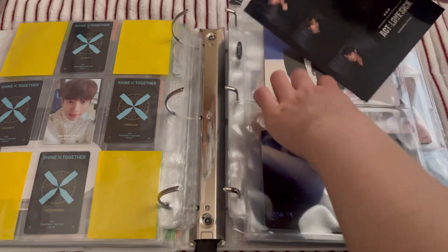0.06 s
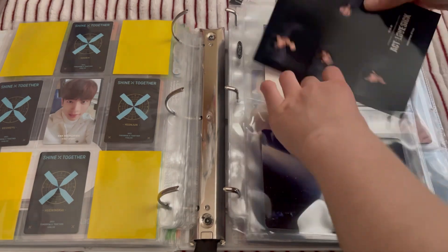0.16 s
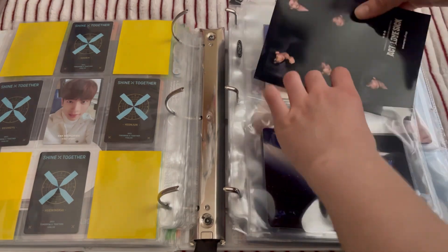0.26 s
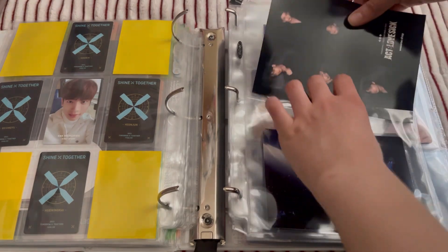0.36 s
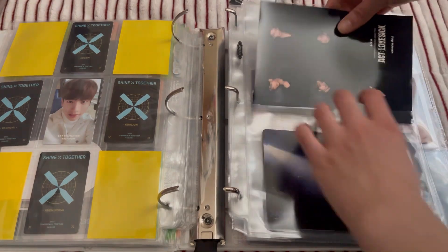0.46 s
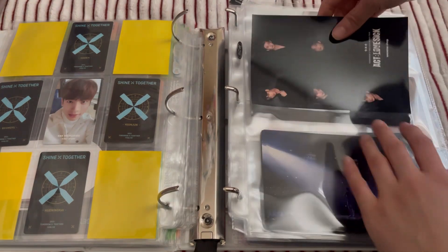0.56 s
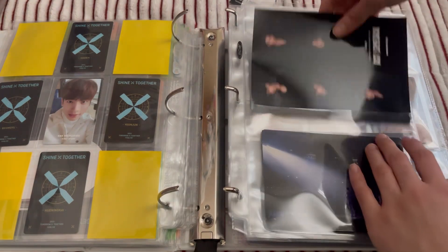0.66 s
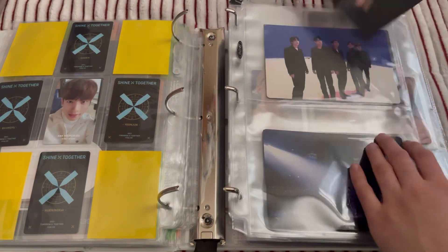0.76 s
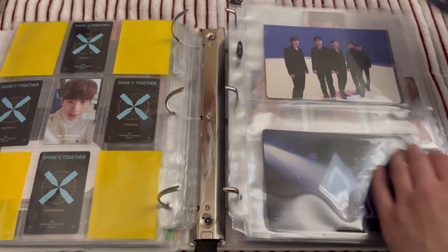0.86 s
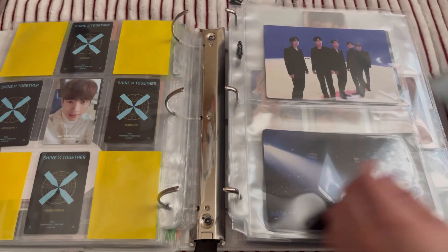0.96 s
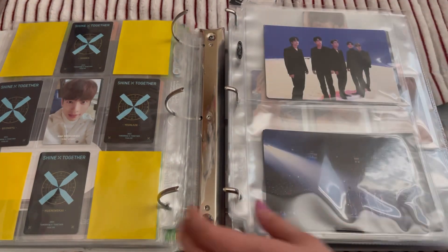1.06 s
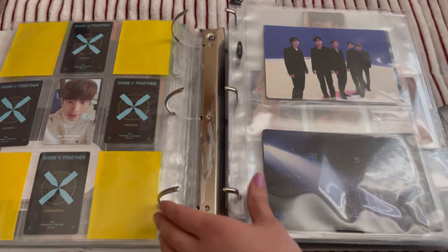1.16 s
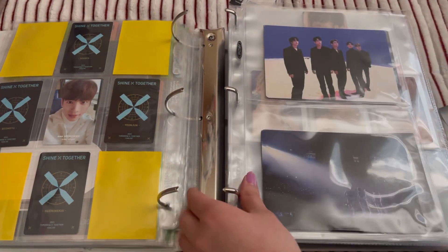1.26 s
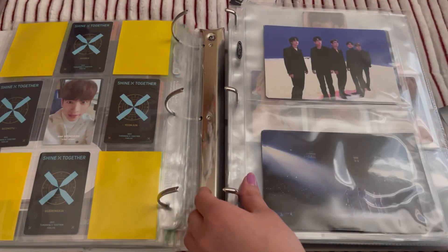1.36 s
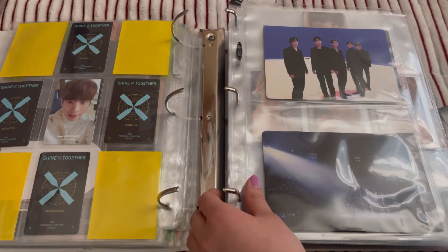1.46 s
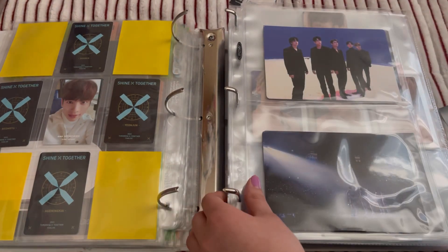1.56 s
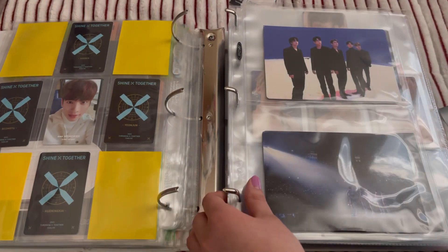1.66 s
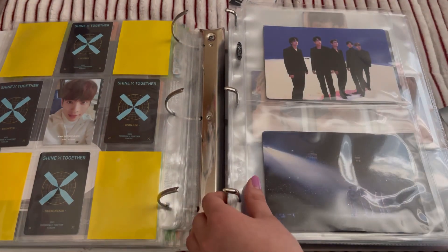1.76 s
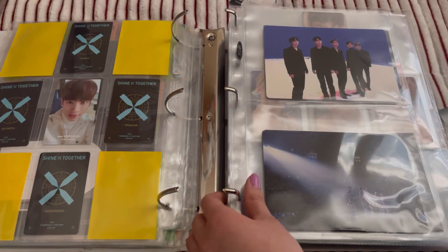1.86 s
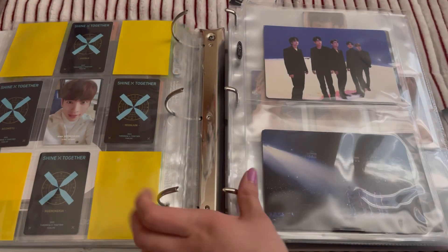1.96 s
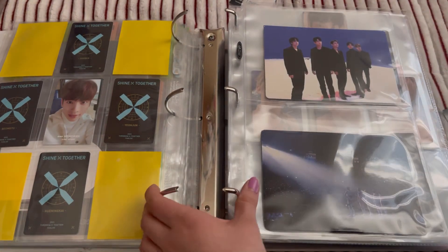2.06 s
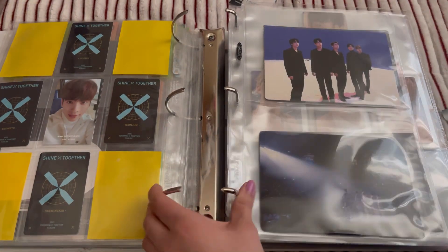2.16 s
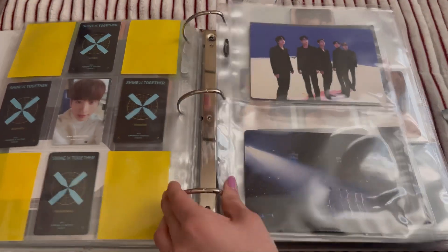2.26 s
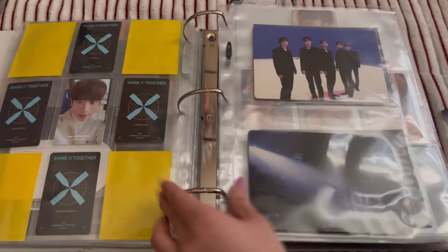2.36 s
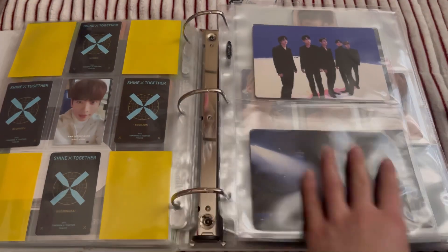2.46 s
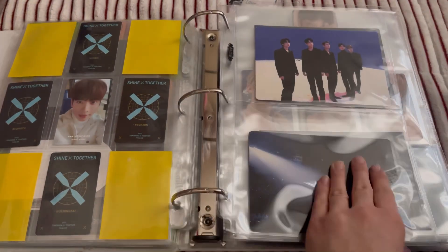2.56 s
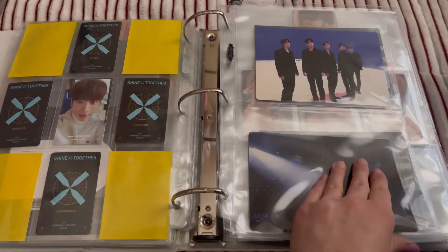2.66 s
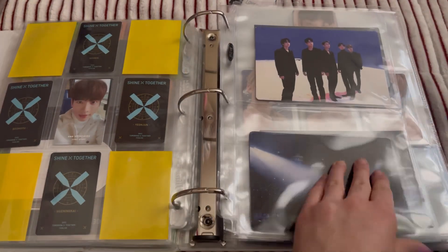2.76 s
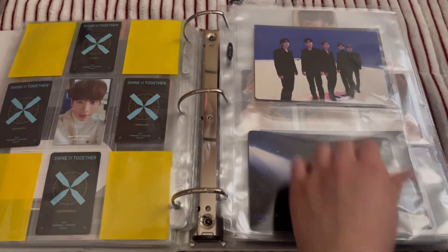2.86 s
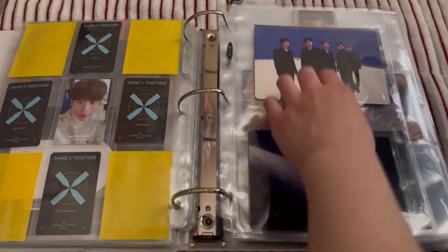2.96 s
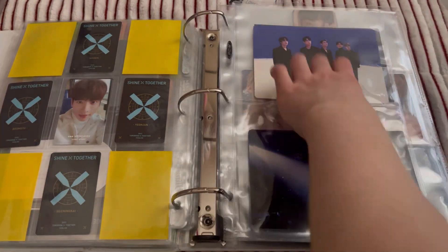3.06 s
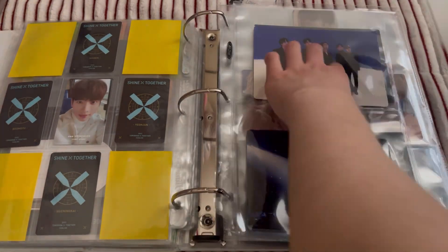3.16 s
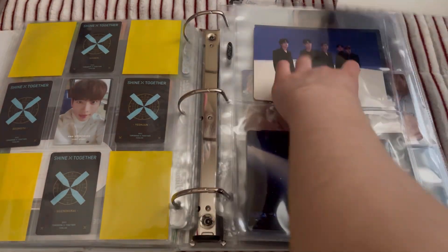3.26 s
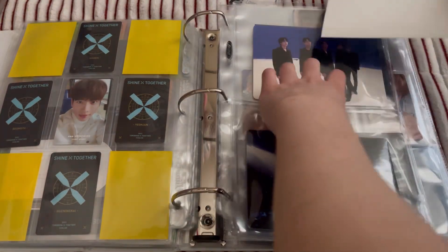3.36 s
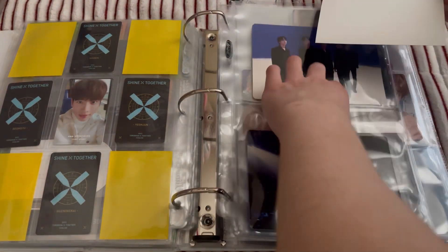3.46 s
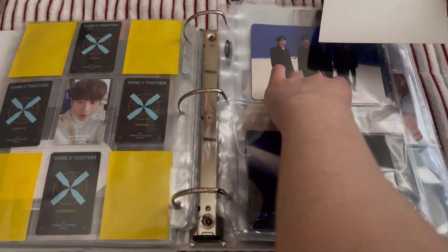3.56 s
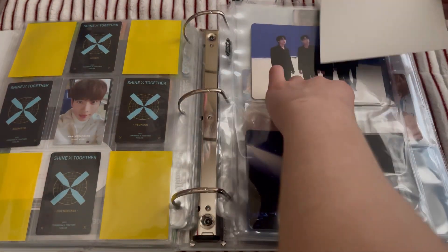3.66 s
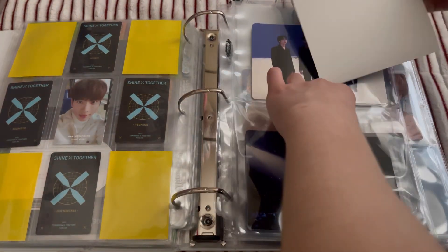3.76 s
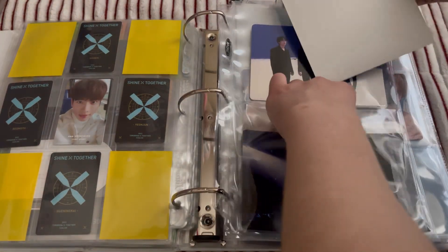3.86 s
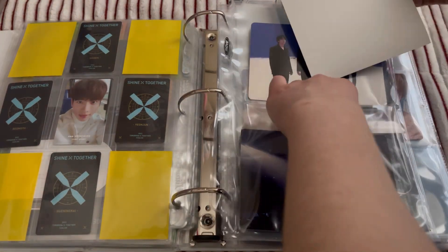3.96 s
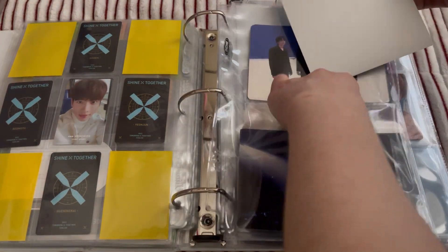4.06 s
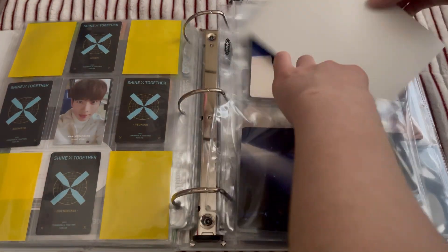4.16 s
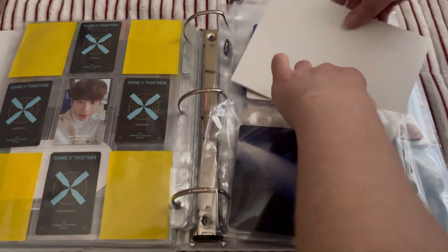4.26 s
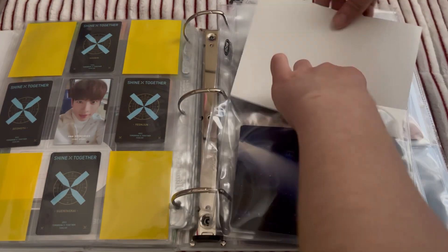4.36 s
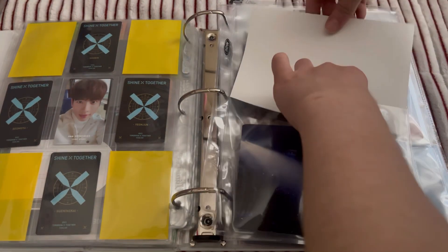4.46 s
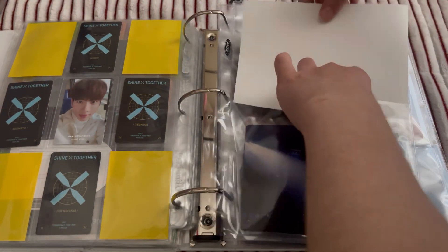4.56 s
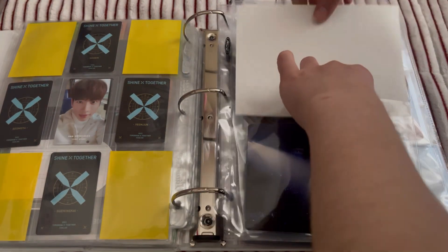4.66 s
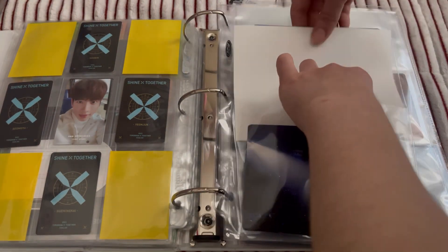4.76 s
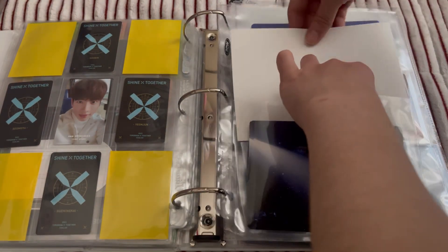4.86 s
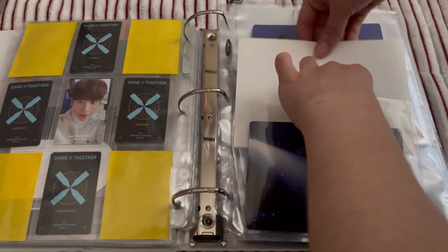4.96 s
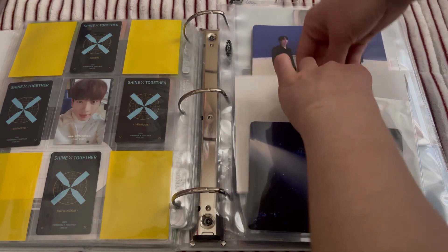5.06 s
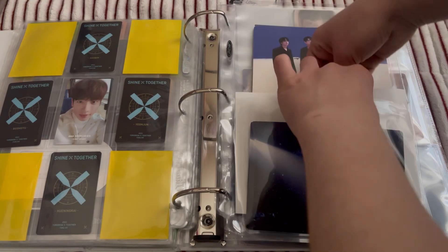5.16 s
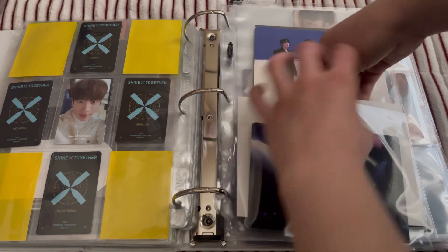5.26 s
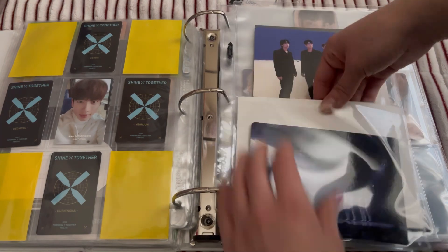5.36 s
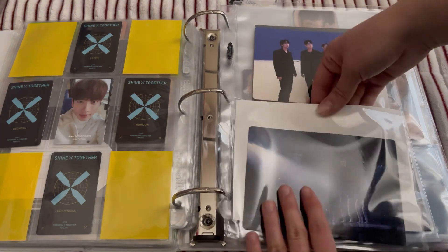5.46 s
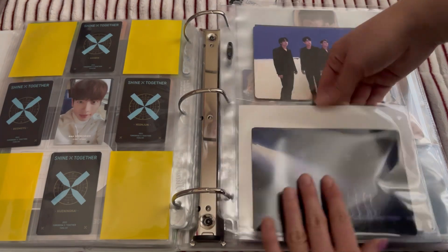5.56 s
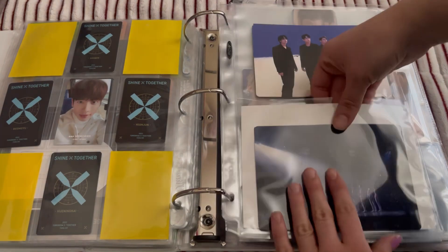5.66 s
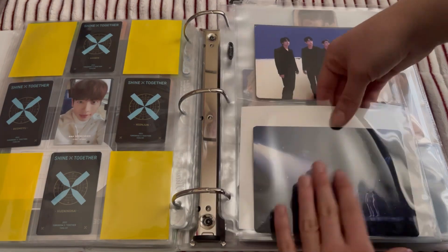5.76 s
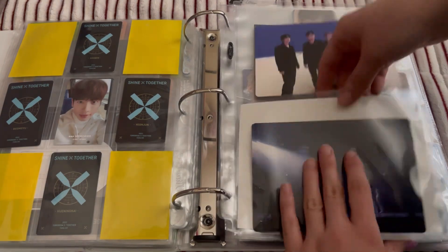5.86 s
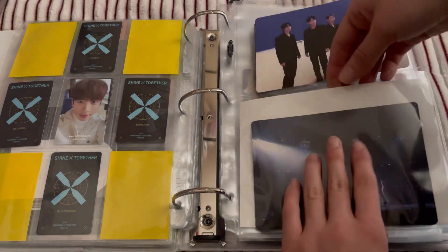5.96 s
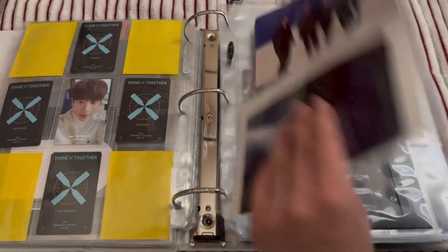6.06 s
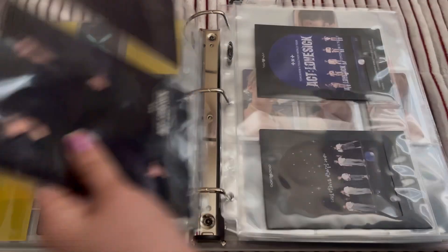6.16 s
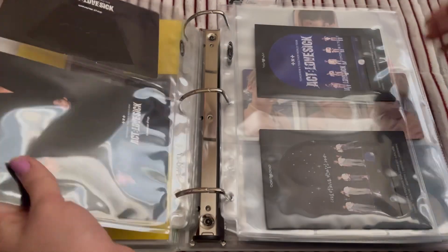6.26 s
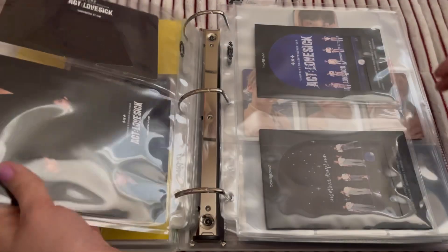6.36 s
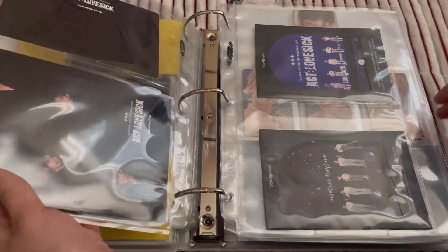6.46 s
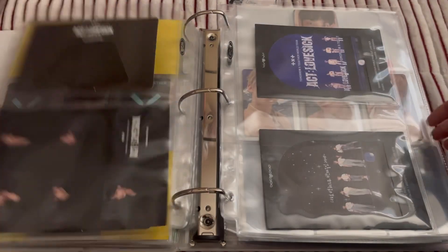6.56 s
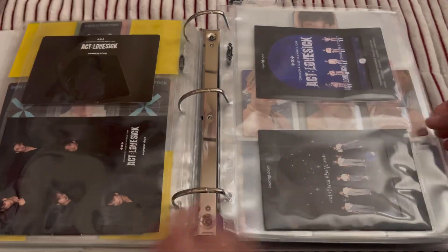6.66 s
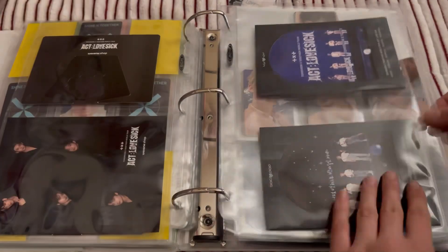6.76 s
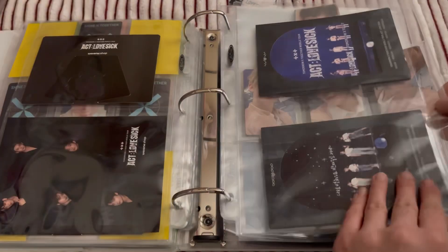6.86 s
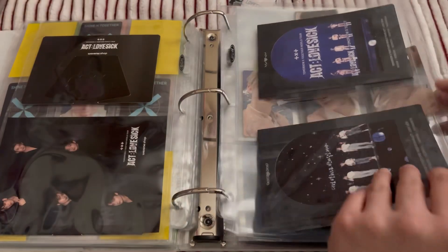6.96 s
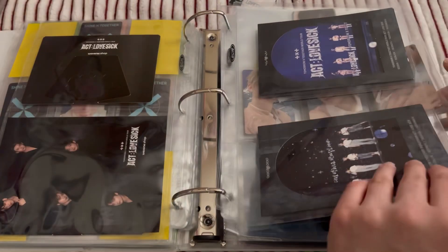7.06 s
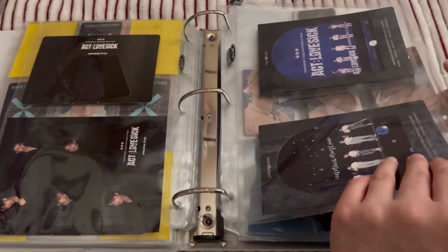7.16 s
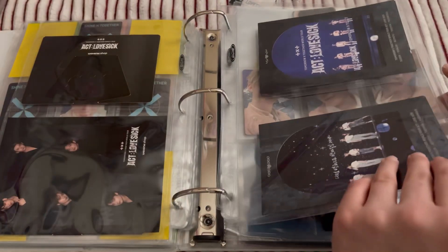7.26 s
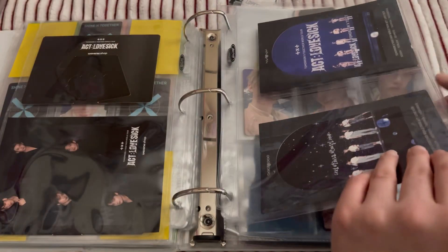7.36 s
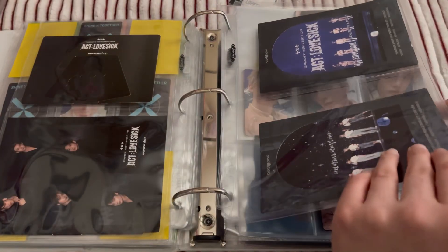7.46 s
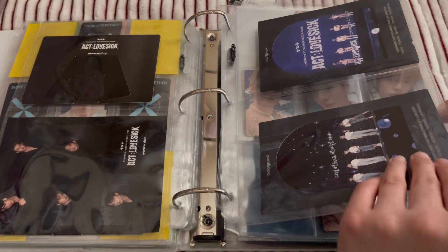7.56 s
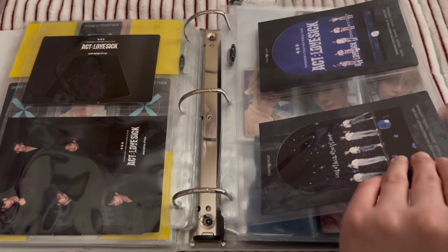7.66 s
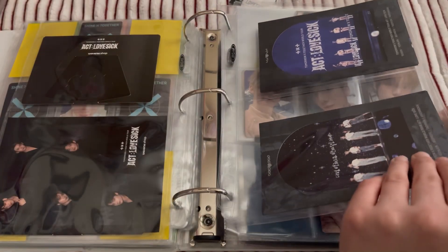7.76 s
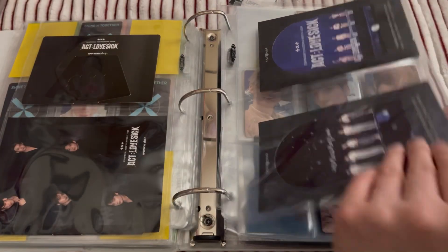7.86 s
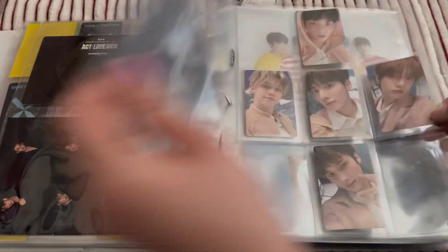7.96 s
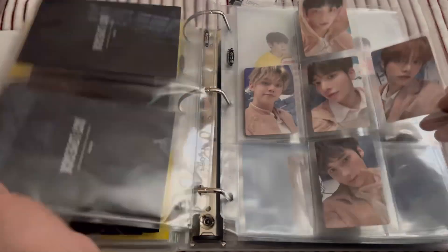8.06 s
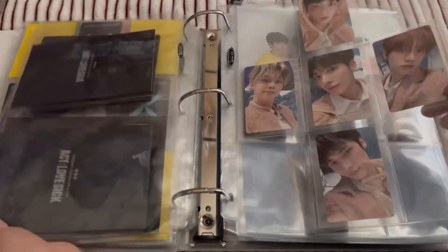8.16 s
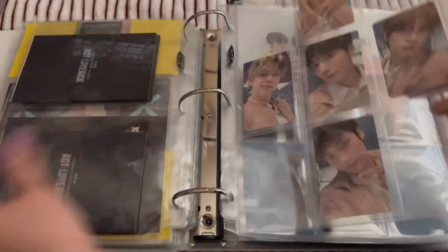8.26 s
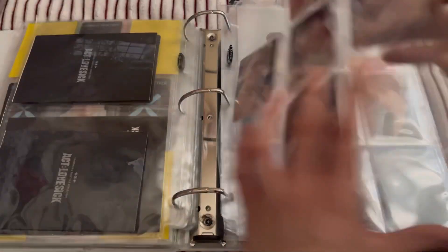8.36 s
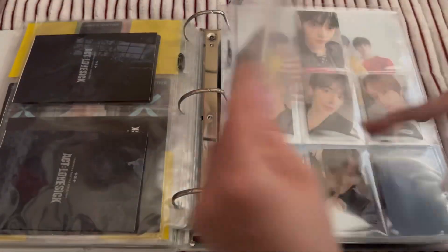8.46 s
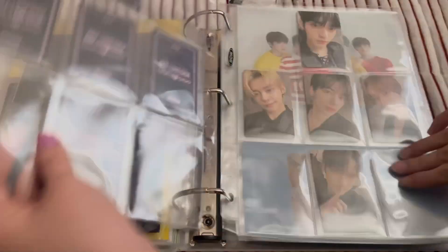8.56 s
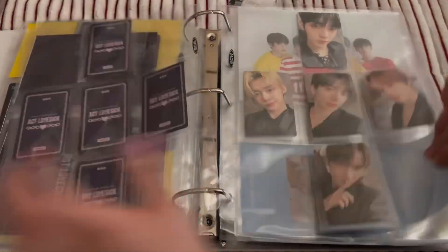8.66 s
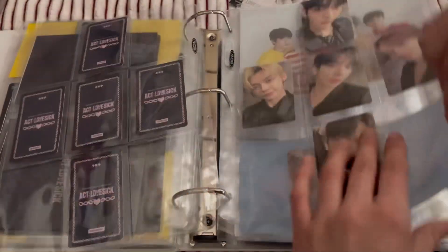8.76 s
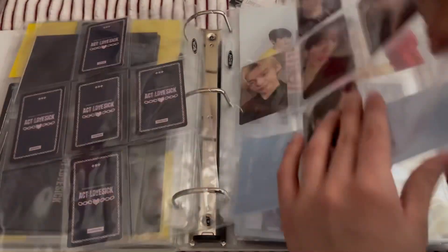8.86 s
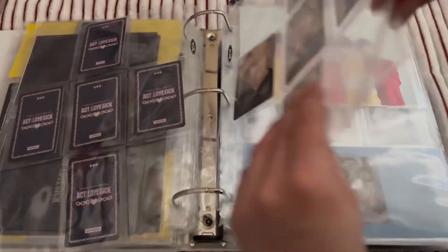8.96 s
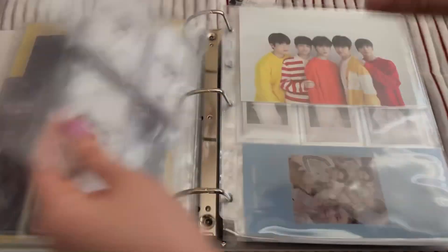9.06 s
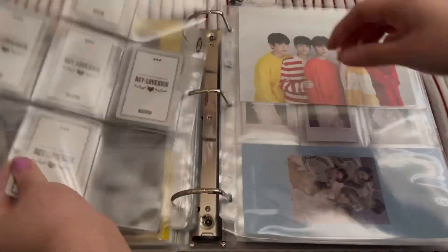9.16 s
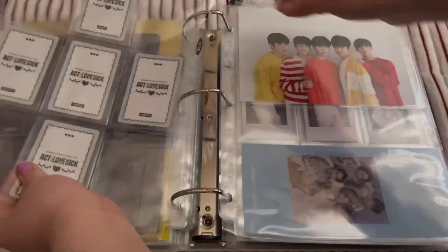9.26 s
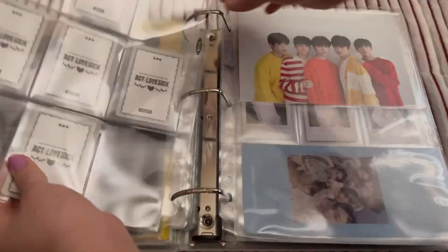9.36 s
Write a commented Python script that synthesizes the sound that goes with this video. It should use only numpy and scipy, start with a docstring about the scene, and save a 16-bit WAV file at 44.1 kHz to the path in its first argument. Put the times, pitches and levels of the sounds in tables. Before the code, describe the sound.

A steady, low fan hum lies under intimate, dry handling sounds. Film hisses and pops lightly, a steel ring mechanism closes with one hard clack, then stiff cards scrape and click into a plastic pocket. After a sparse pause, several sleeves are flipped quickly, crackling brightly and landing with dull flops. Close stereo phone pickup, little room reflection.

```python
"""Binder of plastic sleeves

Hands work on a ring binder of clear plastic sleeves, close to a phone in a quiet, furnished room.
Cards rub over film as dense random slips through shifting resonances; creases and card edges pop as
short falling-pitch swings with noise cracks. Pages and palms land as damped thuds, the steel rings
snap shut once as a burst of decaying modes, and a fan hums throughout as narrow bands over moving air."""
import sys
import numpy as np
from scipy import signal
from scipy.fft import rfft, irfft, next_fast_len
from scipy.io import wavfile
from scipy.ndimage import uniform_filter1d

SR = 44100
rng = np.random.default_rng(int(sys.argv[2]) if len(sys.argv) > 2 else 0)


def bounce(signal):
    """Save signal as a 16-bit WAV file at the path given by the first command-line argument."""
    frames = np.transpose(np.atleast_2d(signal))
    limited = np.clip(frames, -1, 1)
    pcm = np.round(limited * 32767).astype(np.int16)
    wavfile.write(sys.argv[1], SR, pcm)


N = 414981
TOP_HZ = 16000  # upper limit of resonances, swings and the phone
FIRM_DB = -64.5  # rubbing level of a firm movement

# A card or a finger gliding over the film. Each row: start in seconds, length in seconds, level in dB.
STROKES = [(0.0, 0.025, -61.5), (.035, 0.17, -67), (.31, 0.27, -68), (.652, 0.12, -62), (.81, 0.23, -72.5),
           (1.195, 0.067, -77.5), (2.0, 0.042, -75), (2.44, 0.12, -75), (2.58, 0.16, -70.5),
           (2.755, 0.053, -64), (2.84, 0.063, -77), (2.95, 0.16, -70), (3.14, 0.36, -72),
           (3.42, 0.21, -66.5), (3.735, 0.049, -60.5), (3.8, 0.097, -68.5), (3.98, 0.21, -73),
           (4.14, .13, -59), (4.3, 0.078, -75), (4.42, 0.067, -80), (4.5, 0.14, -69), (4.645, 0.23, -62),
           (4.85, 0.34, -64), (4.93, 0.28, -63.5), (5.19, 0.11, -61), (5.28, 0.32, -69), (5.51, 0.11, -60),
           (5.6, 0.13, -71.5), (5.745, 0.15, -67), (5.94, 0.18, -66), (6.23, 0.075, -70.5),
           (6.52, 0.077, -63), (6.71, 0.17, -67), (6.87, 0.15, -62.5), (7.305, 0.033, -77.5),
           (8.56, .23, -58.5), (8.77, 0.093, -59.5), (8.88, 0.28, -71)]
# A whole sleeve bending as it is opened, lifted or turned.
# Each row: start in seconds, length in seconds, level in dB.
BENDS = [(3.54, 0.046, -52.5), (4.15, 0.12, -59), (4.34, 0.051, -62), (5.23, 0.054, -57),
         (6.015, 0.044, -55), (6.08, 0.032, -50.5), (6.14, 0.072, -53), (6.583, 0.037, -52.5),
         (7.9, 0.12, -61), (7.98, 0.088, -50), (8.105, 0.065, -56.5), (8.2, 0.11, -54), (8.36, 0.15, -50.5),
         (8.49, 0.13, -62), (8.6, 0.13, -51.5), (8.78, 0.12, -56), (8.91, 0.066, -61), (9.025, .1, -46.5),
         (9.13, 0.22, -65.5)]


def undb(db):
    """Decibels to gain."""
    return 10 ** (np.asarray(db) / 20)


def unit(x):
    """Scale to rms 1."""
    return x / np.sqrt(np.mean(x ** 2) + 1e-20)


def clock(length_s):
    """Sample times in seconds of a sound of that length."""
    return np.arange(int(length_s * SR)) / SR


def add(out, start_s, x):
    """Mix a sound into the stereo output, cut at its end."""
    i = max(int(start_s * SR), 0)
    out[:, i:i + x.shape[-1]] += x[..., :N - i]


def colour(x, points):
    """Filter by a spectrum of (Hz, dB) points, interpolated over log frequency."""
    hz, db = np.transpose(points)
    size = next_fast_len(x.shape[-1])
    f = np.maximum(np.arange(size // 2 + 1) * SR / size, 1)
    gain = undb(np.interp(np.log(f), np.log(hz), db))
    return irfft(rfft(x, size) * gain, size)[..., :x.shape[-1]]


def resonate(x, hz, width_hz):
    """One second-order resonance, gain 1 at its centre."""
    g, k = np.tan(np.pi * min(hz, TOP_HZ) / SR), width_hz / hz
    numerator = [g * k, 0, -g * k]
    denominator = [1 + g * k + g * g, 2 * g * g - 2, 1 - g * k + g * g]
    return signal.lfilter(numerator, denominator, x)


def pair(size, likeness):
    """Noise for two microphones, with a common share of its power."""
    c = np.clip(likeness, 0, 1)
    noise = rng.standard_normal((3, size))
    return np.sqrt(c) * noise[2] + np.sqrt(1 - c) * noise[:2]


def ringing(size, likeness, hz, width_hz):
    """Noise gathered around one pitch by two equal resonances; rms 1."""
    return unit(resonate(resonate(pair(size, likeness), hz, width_hz), hz, width_hz))


def panned(db):
    """Left and right gains for a left minus right level in dB."""
    return undb(np.array([[db], [-db]]) / 2)


def walk(rate_hz):
    """Slow random wandering, rms near 1: random steps smoothed over one step."""
    k = int(SR / rate_hz)
    steps = np.repeat(rng.standard_normal(N // k + 2), k)
    return unit(uniform_filter1d(steps, k))[:N]


def fan():
    """Wavering hum over moving air; the bass is alike in both ears, the treble is not."""
    # Spectrum of the moving air. Each row: frequency in Hz, relative level in dB.
    air_spectrum = [(15, -85.5), (25, -46.5), (64, -27.5), (82, -15), (130, -3), (200, -12), (242, -13.5),
                    (317, -21), (354, -24), (439, -24), (962, -26.5), (1700, -33.5), (2610, -33),
                    (5280, -45.5), (8000, -57.5), (16000, -68.5)]
    # Fan hum. Each row: centre in Hz, level in dB, width in Hz of the narrower of two resonances.
    hum_bands = [(114.4, -59.5, 23), (134.3, -56.5, 10), (173.2, -62, 7), (239, -70, 7), (355.1, -73.5, 15),
                 (416, -73.5, 6), (799.4, -73.5, 29), (830, -72, 40), (940, -69.5, 80), (1280, -71.5, 160),
                 (1932, -75, 94), (2614, -75.5, 97), (2900, -87.5, 110)]
    air_db = -52
    side_spectrum = [(200, -25.5), (400, -3), (800, 0), (12000, -2.0)]  # Hz, dB
    mid = colour(rng.standard_normal(N), air_spectrum)
    side = colour(colour(rng.standard_normal(N), air_spectrum), side_spectrum)
    air = undb(air_db) * (mid + side * np.array([[1], [-1]])) / mid.std()
    hum = 0
    for hz, db, width_hz in hum_bands:
        noise = pair(N, 1 / (1 + (hz / 500) ** 4))
        band = resonate(resonate(noise, hz, width_hz), hz, 2 * width_hz)
        hum = hum + undb(db) * unit(band)
    return (air + hum) * panned(-1.1)


def room(x, wet_db=-17, t60_s=0.31):
    """Short, dull reflections of a furnished room: convolution with decaying noise."""
    t = clock(0.26)
    tail = resonate(pair(len(t), .1), 2000, 7000) * undb(-60 * t / t60_s) * (t > .004)
    tail /= np.sqrt(np.sum(tail ** 2, axis=1, keepdims=True))
    return x + undb(wet_db) * signal.fftconvolve(x, tail, axes=1)[:, :N]


def thuds(table, slap_db):
    """Soft blows: a damped swing of the stack or cover with an uneven slap around the same pitch."""
    out, t = np.zeros((2, N)), clock(0.38)
    for start_s, db, hz, t60_s in table:
        slap = unit(resonate(pair(len(t), 0.86), hz, 0.94 * hz))
        blow = undb(-60 * t / t60_s) * (np.sin(2 * np.pi * hz * t) + undb(slap_db) * slap)
        # little is radiated below the blow's own pitch
        radiation = signal.butter(3, [hz / 2, 3 * hz], "band", fs=SR, output="sos")
        add(out, start_s, undb(db) * signal.sosfilt(radiation, blow))
    return out * panned(-2.3)


def rings(ring_db=-9, clash_db=-25, clash_s=0.00082, clatter_db=-30, clatter_t60_s=0.09, lag_s=.00002):
    """The sprung rings clash and chatter; the steel rings briefly and the cover thumps."""
    # Rings closing, tooth after tooth. Each row: start in seconds, force in dB.
    snap = [(2.2407, -31.5), (2.24722, -23), (2.24895, -8.5), (2.25062, -10), (2.25093, -2.5),
            (2.25151, 0.2), (2.2518, 2.2), (2.25294, -14.5)]
    # Modes of the steel mechanism. Each row: frequency in Hz, relative level in dB, t60 in seconds.
    steel_modes = [(1446, -28.5, 0.024), (1784, -7, .01), (2120, -42.5, .14), (2495, -30, .018),
                   (3140, -12.5, .014), (3230, -37, 0.073), (3288, -10.2, .012), (3700, -12.5, .016),
                   (4030, -4.5, .012), (4710, -21.5, .035), (5247, -16, .016), (6366, -22.5, 0.024),
                   (8280, -25.5, .067), (9100, -24, .013), (11993, -31.5, .01), (14300, -23.5, .024),
                   (15450, -10.5, .016)]
    # Rattle of the spine. Each row: frequency in Hz, relative level in dB.
    clatter_spectrum = [(900, -24), (1250, -5.5), (1900, -7.5), (2800, -0.5), (3250, 4.5), (3900, -7),
                        (4800, -8), (6000, -8), (8000, -12), (12500, -16), (15500, -14.5)]
    # Cover pushed by the spring. Each row: start in seconds, level in dB, pitch in Hz, t60 in seconds.
    cover = [(2.2526, -24.5, 463, 0.02), (2.2542, -28, 233, 0.045), (2.2566, -31, 135, 0.1)]
    out, t = np.zeros((2, N)), clock(.2)
    arrival = np.maximum(t - np.array([[lag_s], [0]]), 0)  # the left microphone is a little further away
    steel = 0
    for hz, mode_db, t60_s in steel_modes:
        steel = steel + undb(mode_db - 60 * t / t60_s) * np.sin(2 * np.pi * hz * arrival)
    for start_s, db in snap:
        clash = unit(resonate(pair(len(t), .3), 6500, 7000)) * np.exp(-t / clash_s) * panned(-10.0)
        add(out, start_s, undb(db) * (undb(ring_db) * steel + undb(clash_db) * clash))
    # thin wire radiates almost no bass
    out = signal.sosfilt(signal.butter(4, 1050, "high", fs=SR, output="sos"), out)
    # at the hardest blow the whole spine rattles in many dense modes
    hardest_s, _ = max(snap, key=lambda row: row[1])
    clatter = unit(colour(pair(len(t), 0.47), clatter_spectrum))
    add(out, hardest_s, clatter * undb(clatter_db - 60 * t / clatter_t60_s))
    return out * panned(-1.1) + thuds(cover, slap_db=-10.0)


def grains(size, rate_hz, spread_db, decay_s):
    """Envelope of many tiny slips: random times, a few much stronger than the rest; rms 1."""
    chance, strength = rng.random(size), np.minimum(rng.exponential(size=size), 5)
    energy = (chance < rate_hz / SR) * undb(spread_db * strength) ** 2
    return unit(np.sqrt(signal.lfilter([1], [1, -np.exp(-2 / (decay_s * SR))], energy)))


def flexing(slips, depth_db=2.5):
    """Slips excite a sheet whose resonances come and go as it bends."""
    drive = slips * pair(N, 0.42)
    centres_hz = np.geomspace(400, 15000, num=34)
    return sum(resonate(drive, hz, hz / 8) * undb(depth_db * walk(36)) for hz in centres_hz)


def movements(table, peak_share, speed_power=1.2, settle_s=0.082, settle_db=-13):
    """Rubbing level follows hand speed, from rest to a peak and back; then the film creeps and fizzes."""
    t, power = np.arange(N) / SR, np.zeros(N)
    for start_s, length_s, db in table:
        span = slice(max(int(start_s * SR), 0), int((start_s + length_s) * SR))
        corners_s = start_s + length_s * np.array([0, np.clip(peak_share, .1, .9), 1])
        progress = np.interp(t[span], corners_s, [0, .5, 1])
        speed = np.abs(np.sin(np.pi * progress))
        power[span] += (undb(db) * speed ** speed_power) ** 2
    keep = np.exp(-2 / (settle_s * SR))
    settling = signal.lfilter([1 - keep], [1, -keep], power)
    return np.sqrt(power + undb(settle_db) ** 2 * settling)


def sliding(jerk_db=2.66):
    """Card and film catch and slip: shared slips drive hiss and body, and tiny wrinkles tick on top."""
    # Spectrum of the hiss and ticks. Each row: frequency in Hz, relative level in dB.
    hiss_spectrum = [(2500, -29.5), (4500, -12.5), (6500, -6.5), (8500, -3), (11000, -3), (13000, 0),
                     (15800, -5)]
    # Spectrum of the sheet's body. Each row: frequency in Hz, relative level in dB.
    body_spectrum = [(200, -4), (420, 3.5), (900, 6), (1500, 0.5), (2200, -4), (3000, 3.5), (4300, -7.5),
                     (6300, -10), (10000, -33.5)]
    stroke_body_db, bend_hiss_db = -1.5, -13.5  # gliding sounds hiss and body almost equally, bending mostly sounds the sheet
    tick_db, tick_growth = -74.5, 0.89  # level at firm effort; dB gained per dB of effort
    # peak_share: how far into the movement the hand is fastest
    glide, bend = movements(STROKES, peak_share=0.48), movements(BENDS, peak_share=0.38)
    slips = grains(N, rate_hz=4000, spread_db=1.5, decay_s=0.0005)
    sheet = flexing(unit(slips * undb(jerk_db * walk(60))))
    hiss = unit(colour(sheet, hiss_spectrum)) * np.hypot(glide, undb(bend_hiss_db) * bend)
    # a bending sheet crackles: its body answers in short, uneven spurts
    spurts = grains(N, rate_hz=450, spread_db=2.5, decay_s=0.0023)
    body = unit(colour(sheet * spurts, body_spectrum)) * np.hypot(bend, undb(stroke_body_db) * glide)
    wrinkles = grains(N, rate_hz=130, spread_db=3.5, decay_s=.0003)
    ticks = unit(colour(pair(N, .55) * wrinkles, hiss_spectrum))
    effort = np.hypot(glide, bend) / undb(FIRM_DB)
    return hiss + body + undb(tick_db) * ticks * effort ** tick_growth


def swing(t, hz, swings, fall_oct, pitch_share=0.26, lag_s=.00004):
    """Swings of film or card, peak 1: slow bending waves arrive last, so the pitch falls with each."""
    # each one lies elsewhere on the page, so it reaches one microphone first
    arrival = np.maximum(t + lag_s * rng.standard_normal() * np.array([[.5], [-.5]]), 0)
    fall = np.log(2) * max(fall_oct, .001)
    start_hz = min(hz * np.exp(fall * pitch_share * swings), TOP_HZ)
    turn = np.log1p(fall * start_hz * arrival) / fall  # swings completed so far
    x = np.sin(2 * np.pi * turn) * turn * undb(-60 * turn / swings) * (1 - t / t[-1])
    return x / np.abs(x).max()


def clicks(fall_oct=0.055, crack_s=0.0014):
    """A stiff card edge slips: a crack, and the card rings at its own pitch."""
    # Each row: start in seconds, ring level in dB, pitch in Hz, swings of decay, crack level in dB.
    edges = [(0.199, -35, 5500, 9, -35), (0.435, -42.5, 2630, 7, -44), (4.7426, -30.5, 2440, 4.5, -64),
             (4.7922, -28, 3780, 3.2, -37), (4.8267, -30, 2500, 1.7, -48), (4.8315, -33.5, 1580, 3.3, -40),
             (5.2404, -34.5, 2610, 17, -45), (6.0542, -42, 2090, 8.9, -56), (6.6084, -33, 4370, 11, -42),
             (7.9992, -27, 3960, 2.7, -53), (8.5334, -34, 2630, 6.4, -47), (9.0496, -37, 2712, 6.3, -39.5)]
    out, t = np.zeros((2, N)), clock(0.022)
    for start_s, db, hz, swings, crack_db in edges:
        crack = unit(resonate(pair(len(t), 0.43), 6000, 13000)) * np.exp(-t / crack_s)
        add(out, start_s, undb(db) * swing(t, hz, swings, fall_oct) + undb(crack_db) * crack)
    return out


def crumples(rate_hz=1100, spread_db=4, swings=4.3, fall_oct=0.39):
    """Bursts of small creases giving way in turn, each with its own pitch and strength."""
    # Film crumpling under the fingers. Each row: middle in seconds, half length in seconds, level in dB,
    # pitch in Hz, pitch spread in octaves.
    bursts = [(0.198, 0.0042, -48, 7900, 0.42), (0.435, 0.0083, -45, 11600, 0.1),
              (0.747, 0.0061, -44, 1220, 0.28), (0.708, 0.053, -57, 12500, .25),
              (2.891, .012, -60, 4000, 0.66), (3.437, 0.0065, -48.5, 11700, 0.18),
              (3.463, .003, -50, 12000, .15), (3.575, 0.018, -55, 11500, 0.26),
              (3.765, 0.0074, -52, 12600, 0.096), (4.185, 0.028, -54.5, 2000, .8),
              (4.226, 0.019, -51, 2600, 0.68), (4.254, .006, -48, 900, .3), (5.245, 0.007, -45, 2680, .08),
              (5.261, 0.017, -45, 9000, 0.3), (5.266, 0.0099, -47, 2020, 0.3),
              (5.897, 0.0084, -53, 12000, .2), (6.03, .012, -47, 8030, 0.23),
              (6.036, 0.016, -46.5, 1890, .5), (6.054, 0.0056, -48, 1900, .2),
              (6.079, 0.0042, -41, 6960, .4), (6.097, 0.017, -47.5, 8100, 0.42),
              (6.098, .017, -50, 1500, 0.4), (6.188, 0.02, -48, 2500, 1.07), (6.6, 0.012, -45, 4210, 0.67),
              (6.729, .008, -53, 3000, 0.6), (6.905, 0.044, -54.5, 2004, 1.03),
              (8.012, .016, -44.5, 1097, 0.82), (8.058, 0.011, -42.5, 1100, 0.83),
              (8.143, 0.0087, -49, 4000, 1.1), (8.235, .02, -61, 3000, 1), (8.272, 0.013, -53, 4000, 0.94),
              (8.373, 0.012, -43.5, 1000, 0.45), (8.42, 0.027, -41.5, 1000, 0.58),
              (8.433, 0.0064, -40.5, 6000, .4), (8.466, 0.011, -43, 1730, 0.46),
              (8.53, 0.0075, -48, 2590, 0.47), (8.654, 0.028, -46, 3296, 0.66),
              (8.828, 0.03, -48, 2500, 1.12), (9.072, 0.015, -41.5, 3000, 0.76),
              (9.086, 0.023, -44, 890, 0.73)]
    out, t = np.zeros((2, N)), clock(0.017)
    for middle_s, half_s, db, hz, spread_oct in bursts:
        count = int(2 * half_s * rate_hz) + 2
        burst = np.zeros((2, int(2 * half_s * SR) + len(t) + 1))
        for k, (strength, pitch) in enumerate(rng.standard_normal((count, 2)).clip(-2, 2)):
            moment = (k + rng.random()) / count
            flip = rng.choice([-1, 1]) * swing(t, hz * 2 ** (spread_oct * pitch), swings, fall_oct)
            swell = np.sin(np.pi * moment) ** 2
            add(burst, 2 * half_s * moment, undb(spread_db * strength) * swell * flip)
        length_gain = np.sqrt(0.45 * half_s * SR / burst.shape[1])
        add(out, middle_s - half_s, undb(db) * unit(burst) * length_gain)
    return out


def crinkles(table, count):
    """Each movement flips a few small creases at random moments, strengths and pitches; rows as for pops."""
    level_db, spread_db, crack_db = -50, 3.5, -17  # level at firm effort; crack relative to the pop
    centre_hz, spread_oct = 2432, 0.71
    growth = 0.43  # dB gained per dB of effort
    all_moments = rng.random((len(table), count))
    all_draws = rng.standard_normal((len(table), count, 2)).clip(-2, 2)
    rows = []
    for (start_s, length_s, effort_db), moments, draws in zip(table, all_moments, all_draws):
        for moment, (strength, pitch) in zip(moments, draws):
            db = level_db + growth * (effort_db - FIRM_DB) + spread_db * strength
            hz = centre_hz * 2 ** (spread_oct * pitch)
            rows.append((start_s + moment * length_s, db, hz, db + crack_db))
    return rows


def pops(table, swings=3.78, fall_oct=1.14, flutter_s=0.0048, flutter_db=-17, crack_s=0.00069,
         knock_hz=680, knock_s=0.0044, knock_db=-21):
    """A crease flips: a crack, a few swings of film, a sheet flutter and a knock of the card under it."""
    out, t = np.zeros((2, N)), clock(.04)
    for start_s, db, hz, crack_db in table:
        flutter = ringing(len(t), .3, hz, 2.1 * hz) * np.exp(-t / flutter_s)
        knock = ringing(len(t), .77, knock_hz, 1.5 * knock_hz) * np.exp(-t / knock_s)
        crack = unit(resonate(pair(len(t), 0.31), 12000, 12000)) * np.exp(-t / crack_s)
        pop = swing(t, hz, swings, fall_oct) + undb(flutter_db) * flutter + undb(knock_db) * knock
        add(out, start_s, undb(db) * pop + undb(crack_db) * crack)
    return out


def scene():
    """The binder a little to the right, the film sounding where the hands are, the fan behind."""
    # Creases popping. Each row: start in seconds, pop level in dB, pitch in Hz, crack level in dB.
    creases = [(0.116, -42.5, 3070, -51), (0.7496, -46, 1300, -48), (1.394, -49, 6360, -50),
               (2.1662, -42.5, 3870, -51), (2.3473, -44, 1700, -59), (2.369, -43, 2620, -44),
               (2.461, -56, 6000, -44), (2.4718, -39.5, 3820, -41), (2.479, -45, 2540, -46.5),
               (2.786, -58, 2390, -42.5), (2.9658, -39, 2120, -66), (3.047, -42, 1900, -45.5),
               (3.067, -52, 4000, -53), (3.131, -43, 2070, -47), (3.1985, -37, 4700, -46),
               (3.2437, -42, 2540, -51), (3.3352, -41, 2870, -45), (3.344, -48, 3000, -52),
               (3.368, -52, 5000, -51), (3.4405, -41, 1310, -44.5), (3.4359, -32, 2000, -40),
               (3.4622, -35.5, 3030, -29), (3.5504, -35.5, 3780, -44), (3.9558, -36.5, 1780, -71),
               (4.003, -58, 6060, -54), (4.13, -39, 3970, -63), (4.1564, -29.5, 2160, -33),
               (4.1907, -35.5, 2308, -59), (4.3367, -41, 2790, -49), (4.363, -38, 3420, -51),
               (4.3791, -30.5, 2350, -46), (4.5612, -35, 4030, -29.5), (4.6105, -50, 6000, -50),
               (5.267, -36.5, 1926, -44), (5.423, -54, 6000, -50), (5.586, -40, 4600, -32),
               (5.776, -45, 4500, -50), (6.0286, -51, 2917, -39), (6.036, -45, 2300, -44),
               (6.052, -36, 1603, -65), (6.0774, -32, 3300, -36), (6.1352, -42, 3890, -48),
               (6.1395, -37, 4500, -54), (6.1505, -40, 4500, -43), (6.1735, -34, 5000, -48),
               (6.1764, -31.5, 2790, -39), (6.5509, -42, 4590, -51), (6.559, -52, 6040, -47),
               (6.6087, -39.5, 3000, -39), (6.7254, -39, 2740, -49), (6.897, -42, 1692, -48),
               (6.927, -42.5, 1289, -60), (7.6659, -50, 3220, -54.5), (8.0178, -26.5, 2736, -56),
               (8.0472, -27.5, 1076, -54), (8.0618, -27.5, 1877, -61), (8.112, -29, 1900, -59),
               (8.158, -32, 2200, -59), (8.2235, -39, 2100, -45), (8.2546, -36, 2130, -58),
               (8.434, -38, 4597, -29), (8.57, -56, 5026, -53), (8.625, -46, 3000, -39),
               (8.6494, -32, 3080, -50), (8.7245, -40.5, 4024, -51), (8.781, -50, 5040, -49),
               (8.8265, -48, 3505, -37), (8.87, -37.5, 4500, -58), (8.9229, -25.5, 1600, -64),
               (9.0121, -37.5, 3300, -53), (9.0658, -37, 1596, -48), (9.0749, -24.5, 2597, -40),
               (9.0902, -35, 1896, -56), (9.1117, -30, 2860, -63), (9.1891, -28.5, 3270, -63)]
    # Pages and palms landing on the stack.
    # Each row: start in seconds, level in dB, pitch in Hz, t60 in seconds.
    flops = [(.747, -43.5, 570, 0.024), (3.436, -47.5, 760, 0.027), (3.462, -43, 904, 0.015),
             (4.252, -40.5, 602, 0.026), (5.268, -41, 448, .02), (6.05, -49, 520, .05),
             (6.105, -39, 150, .06), (6.178, -43, 326, 0.026), (6.36, -47, 64.4, 0.28),
             (6.603, -52, 650, 0.022), (8.006, -41.5, 446, 0.1), (8.046, -36, 521, 0.027),
             (8.371, -34.5, 240.4, 0.072), (8.406, -39, 184.8, 0.097), (8.41, -36.5, 95, 0.12),
             (8.41, -43, 600, 0.037), (8.42, -37.5, 280, 0.077), (8.465, -35, 140, 0.056),
             (8.535, -41.5, 483, 0.028), (8.622, -45.5, 238, 0.1), (8.81, -42, 197.8, 0.049),
             (8.972, -41.5, 157.6, 0.1), (9.078, -40.5, 430, 0.084), (9.112, -41, 483, 0.031)]
    # Where the hands work, right page first, then across the spine and back.
    # Each row: time in seconds, left minus right level in dB.
    hand_pan = [(0, -5.5), (5.3, -5), (6.05, -5.5), (6.2, -1), (6.6, -1.5), (6.75, -5.5), (8.0, -4),
                (8.2, 0), (8.42, -3.5), (8.92, -5.5), (9.1, -3)]
    hum, snap = fan(), room(rings(), wet_db=-32, t60_s=.25)
    pan_db = np.interp(np.arange(N) / SR, *np.transpose(hand_pan))
    all_creases = creases + crinkles(STROKES, count=2) + crinkles(BENDS, count=4)
    film = sliding() + pops(all_creases) + clicks() + crumples()
    film = film * undb(np.array([pan_db, -pan_db]) / 2)
    return room(film + thuds(flops, slap_db=0.5), wet_db=-19.5) + snap + hum


def record(dry):
    """The phone cuts the top of the treble with a steep low-pass."""
    return signal.sosfilt(signal.ellip(10, .2, 70, TOP_HZ, fs=SR, output="sos"), dry)


dry = scene()
out = record(dry)
bounce(out)
```